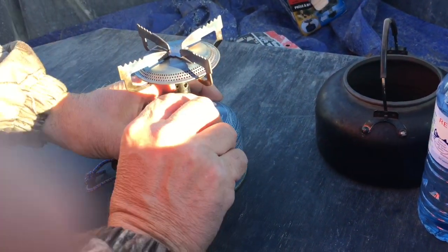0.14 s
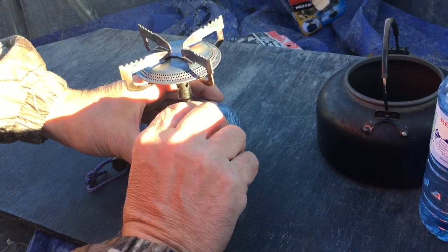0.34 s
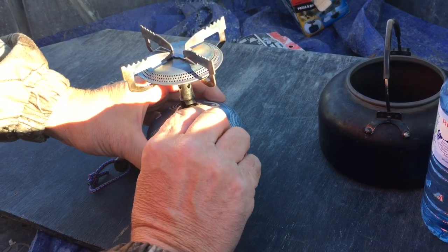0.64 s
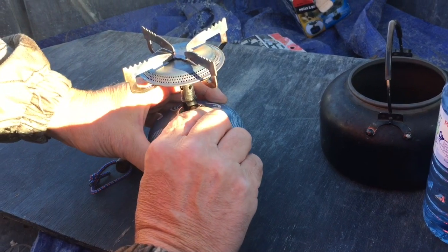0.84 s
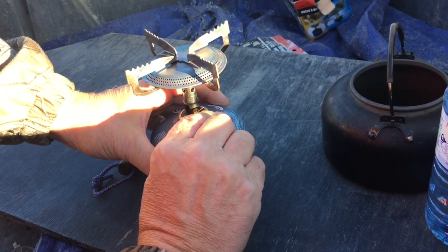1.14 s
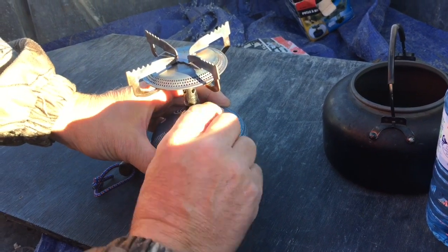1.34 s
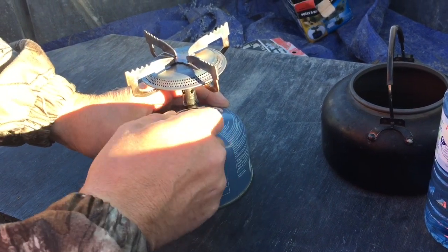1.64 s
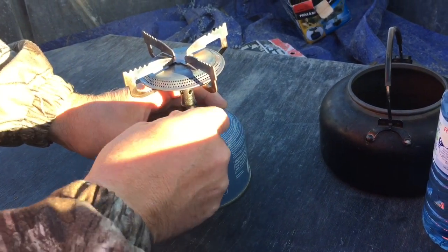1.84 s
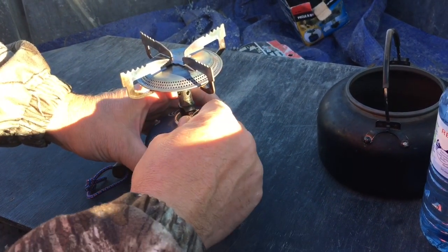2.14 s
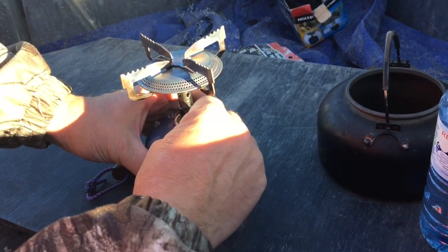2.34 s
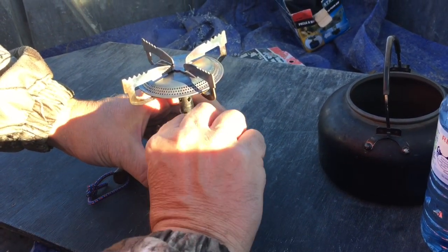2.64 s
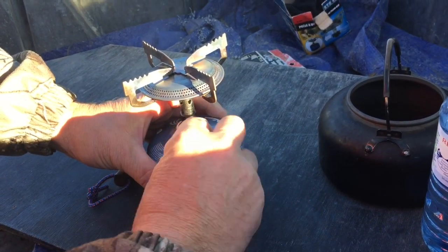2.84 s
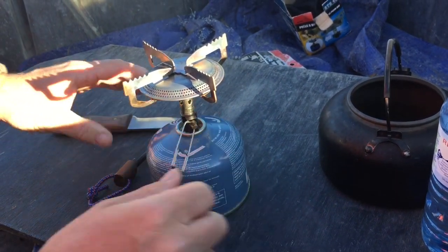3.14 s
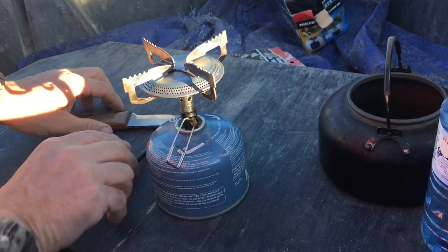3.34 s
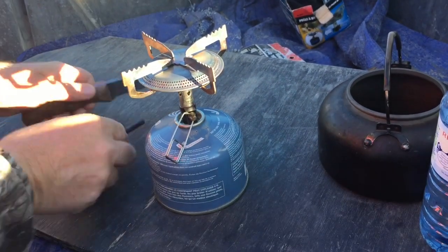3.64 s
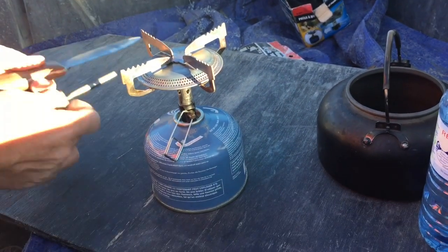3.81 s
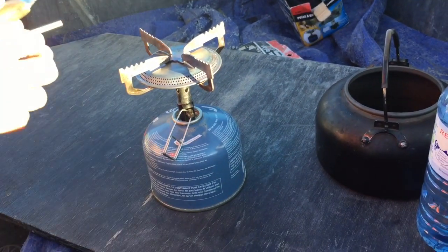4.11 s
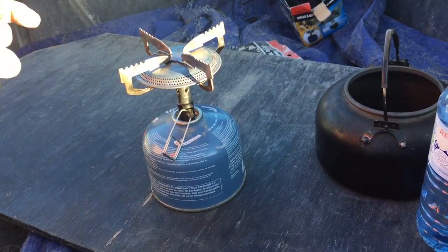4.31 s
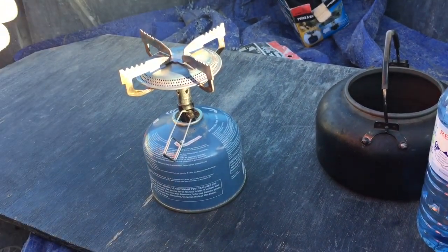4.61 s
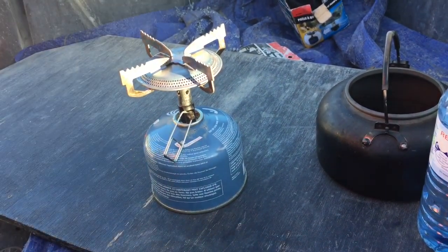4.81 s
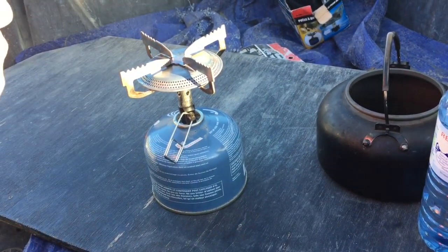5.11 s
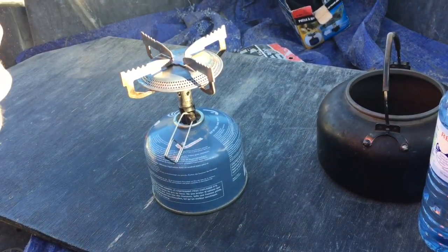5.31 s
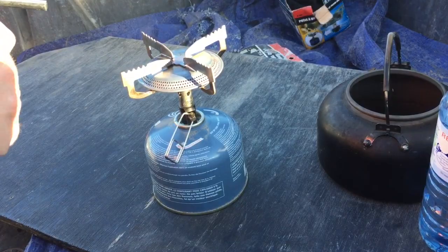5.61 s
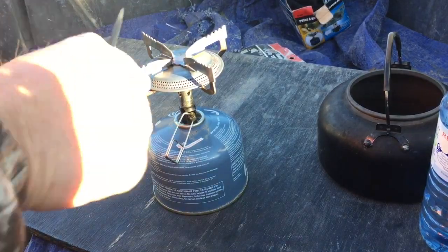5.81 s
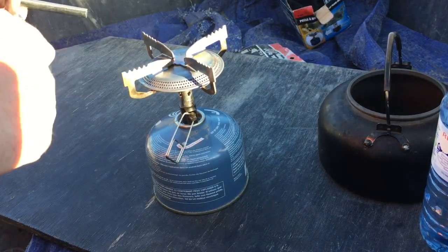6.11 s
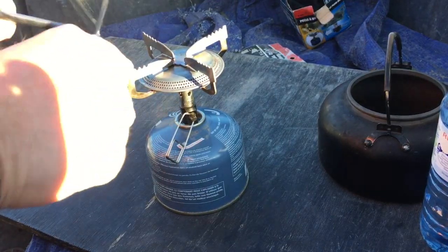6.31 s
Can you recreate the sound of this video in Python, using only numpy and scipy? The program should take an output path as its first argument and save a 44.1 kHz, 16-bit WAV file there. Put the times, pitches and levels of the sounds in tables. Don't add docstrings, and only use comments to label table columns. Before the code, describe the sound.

Dull handling knocks, bright metallic clinks, then a sharp unlit gas hiss that holds on over wooden scraping, steel taps and a faint far engine hum.

```python
import sys
import numpy as np
from scipy import signal
from scipy.fft import rfft, irfft, next_fast_len
from scipy.io import wavfile
from scipy.ndimage import uniform_filter1d

SR = 44100
rng = np.random.default_rng(int(sys.argv[2]) if len(sys.argv) > 2 else 0)


def decibels_to_gain(level_db):
    exponent = np.asarray(level_db, float) / 20
    return 10 ** exponent


def unload_audio(sound):
    columns = np.transpose(np.atleast_2d(sound))
    steps = np.round(np.clip(columns, -1, 1) * 32767)
    wavfile.write(sys.argv[1], SR, steps.astype(np.int16))


N = 284886

# frequency in Hz, density in dB per Hz.
JET_SPECTRUM = [(200, -8.5), (300, 0.5), (484, -10), (630, 1), (800, -9), (1470, -8.5), (2200, -6.5),
                (3390, -13.5), (4960, -1), (8070, -10.5), (10600, -18), (12500, -12), (15700, -5.5)]
# frequency in Hz, width in Hz, level in dB.
BURNER_RESONANCES = [(1000, 196, -11.5), (1848, 230, -4), (2475, 110, -2), (3770, 140, -16.5),
                     (4795, 210, -5), (5040, 120, 1), (5310, 73, -7), (5870, 49, -9), (6800, 150, -12),
                     (7250, 99, -8), (7590, 105, -9.5), (9040, 390, -15.5), (11430, 140, -11.5)]
# frequency in Hz, width in Hz, level in dB.
HEAD_WHISTLES = [(2755, 130, -11), (5060, 46, -1), (5370, 57, -8.5), (7310, 83, -9), (9930, 96, -14),
                 (11440, 120, -11)]
# frequency in Hz, level in dB, t60 in seconds.
ARM_MODES = [(711, -4, 0.032), (1170, -11, 0.044), (1640, -15, 0.1), (3247, -8, 0.07), (4000, -22, 0.15),
             (4443, -5, 0.07), (5180, -9.5, 0.076), (5765, -8, 0.06), (6160, -3.5, 0.047),
             (6770, -1.5, 0.043), (7200, -1.5, 0.011), (8730, -14, 0.043), (12440, -13, 0.035),
             (14300, -9, 0.022)]
# frequency in Hz, level in dB, t60 in seconds.
CANISTER_MODES = [(2540, -9, .5), (2630, 0, 0.44), (2720, -11, .25), (2757, -5, .36), (2860, -12, 0.56),
                  (3356, 3, .13), (3445, -6, .3), (3680, -8, .2), (3747, 0, 0.42), (3940, -2, .36),
                  (4160, -9, .23), (4800, -7, .16), (5701, -6, .18), (6500, -8, .19)]
# frequency in Hz, level in dB, t60 in seconds.
STEEL_MODES = [(1165, -11, .025), (1517, -1.5, 0.032), (1900, -24, 0.032), (2330, 0.5, 0.046),
               (2700, 12, 0.024), (3140, 1, 0.039), (4110, 1.5, 0.05), (4500, 2, 0.022), (6000, 2.5, 0.025),
               (7400, -7, 0.049), (9500, -32, 0.026), (10800, -32, .02), (11270, 2, 0.051)]
# start in seconds, peak in dB, strongest frequency in Hz,
# rattle length in seconds, crack share in dB.
CLINKS = [
    (.1694, -26.5, 3600, .012, 0),
    (1.461, -55, 4430, .036, -9),
    (1.8102, -22.5, 6940, 0.011, 2.5),
    (1.968, -36, 6000, 0.013, 0),
    (2.23, -36, 4350, 0.024, -15),
    (2.2753, -37, 1640, 0.01, -4),
    (2.3555, -27, 4550, 0.013, 3),
    (2.4153, -17.5, 2200, 0.011, 6),
]
# start in seconds, peak in dB, strongest frequency in Hz,
# rattle length in seconds, crack share in dB.
THREAD_SLIPS = [(1.49, -54, 6860, .039, -11), (1.52, -49, 1650, 0.036, -4), (1.585, -50, 5830, 0.031, -6),
                (1.806, -25, 711, 0.0053, -32), (1.78, -42, 5700, 0.02, -4), (1.795, -38, 5600, 0.009, -5),
                (1.862, -41, 5900, 0.013, 2), (1.93, -50, 7200, 0.033, -11), (2.05, -57, 6440, 0.092, -6.5),
                (2.24, -43, 4200, 0.016, 4), (2.36, -23.5, 7200, 0.01, -5),
                (2.372, -25.5, 4600, 0.0087, -2)]
# start in seconds, peak in dB, strongest frequency in Hz,
# rattle length in seconds, crack share in dB.
STEEL_TAPS = [
    (5.5132, -19, 4200, 0.015, 3.5),
    (5.8555, -27, 2920, 0.0065, 3),
    (5.888, -35, 2200, 0.0056, 3),
    (6.1676, -18, 2600, 0.007, 8),
    (6.2036, -26, 2400, 0.003, 2),
    (6.2294, -32, 1910, .0068, 2),
]
# start in seconds, peak in dB, strongest frequency in Hz,
# rattle length in seconds, crack share in dB.
STEEL_SCRAPES = [
    (5.518, -27, 7400, 0.0059, 4),
    (5.842, -26.5, 2670, 0.018, -3),
    (5.862, -30, 2500, 0.011, 0),
    (6.21, -33, 2570, .01, -1),
    (6.303, -30, 2630, 0.02, 4),
    (6.335, -30, 2690, 0.015, 0),
    (6.308, -27, 4000, 0.048, 6),
    (5.845, -31, 4300, 0.043, 9),
]
# start in seconds, peak in dB, strongest frequency in Hz,
# rattle length in seconds, crack share in dB.
BLADE_GRATES = [
    (3.475, -33.5, 2400, 0.015, 3),
    (3.549, -30, 2800, 0.023, 6),
    (3.562, -31, 3000, .017, 8),
    (3.6, -39, 1400, 0.044, 3),
    (3.236, -38, 2300, 0.0185, 3),
    (3.447, -33.5, 2000, .004, 8),
]
# start in seconds, peak in dB, length in seconds.
CANISTER_THUDS = [
    (1.46, -46.5, 0.034),
    (1.523, -48, 0.042),
    (1.809, -35, 0.013),
    (1.865, -41, 0.015),
    (2.242, -47, 0.02),
    (2.278, -40.5, 0.012),
    (2.419, -28, 0.015),
]
# start in seconds, level in dB.
CANISTER_BLOWS = [
    (1.812, -56),
    (2.357, -54),
    (2.417, -46),
]
# start in seconds, peak in dB, frequency
# in Hz, t60 in seconds.
LONE_RINGS = [(.172, -48.5, 1640, .3), (1.46, -62, 4430, .06), (1.521, -54, 1640, 0.24),
              (.171, -44, 14200, .05), (1.588, -62, 12600, 0.15), (1.59, -60, 9800, 0.091),
              (1.59, -57, 6000, .08), (1.784, -58, 1640, 0.24), (1.812, -41.5, 1638, 0.19),
              (1.812, -49, 3219, 0.081), (1.812, -54, 4440, .23), (1.813, -44, 5922, 0.13),
              (1.812, -50, 8000, .1), (1.812, -41, 12500, .065), (1.811, -41, 14300, .04),
              (1.866, -49.5, 4420, .12), (1.866, -52, 3120, 0.14), (1.97, -43, 4660, 0.056),
              (1.97, -44, 5674, 0.044), (1.972, -53, 4500, 0.2), (2.23, -41, 4430, .11),
              (.171, -49, 13000, .04), (2.05, -57, 6900, 0.18), (2.08, -57, 5900, .2),
              (2.21, -58, 1664, .2), (2.278, -50, 14400, .04), (2.278, -44, 7000, .04),
              (2.357, -45, 14400, .05), (2.374, -44, 14500, .05), (2.416, -36, 4480, .06),
              (2.416, -41, 14800, .04), (2.418, -58, 10300, 0.091), (3.226, -31, 2160, .03),
              (3.226, -30, 5100, .03), (2.357, -35, 4350, .05), (3.228, -43, 11500, .02),
              (3.245, -34, 2120, .05), (3.246, -39, 12700, .04), (3.247, -46, 14800, .03),
              (3.526, -34, 2270, 0.022), (3.89, -26, 2510, 0.028), (3.89, -26.5, 4950, 0.03),
              (5.514, -23, 4085, 0.045), (5.514, -32, 2120, .05),
              (1.812, -44, 15500, .04), (2.24, -53, 1650, .15), (2.278, -46, 1645, 0.11),
              (2.358, -44, 1650, 0.18), (2.416, -33, 1150, 0.058), (2.418, -34, 370, .22),
              (6.168, -30, 1490, .03), (6.168, -25, 2230, .03), (6.169, -21, 2710, 0.024),
              (6.169, -21, 3960, 0.028), (6.168, -32, 5930, .03)]
# time of the top in seconds, peak in dB, frequency in Hz, rise in seconds.
SQUEAKS = [(1.79, -45, 6850, .004), (1.801, -46, 3100, .003), (1.812, -36, 5300, .003),
           (1.812, -35, 5950, .003), (1.822, -44, 3150, .004), (1.872, -42, 6900, .004),
           (1.885, -52, 3150, .004), (2.605, -45, 420, .008), (2.605, -45, 660, .008),
           (2.603, -46, 1700, .007), (2.62, -42, 2600, .003), (5.852, -23, 2600, .003),
           (5.8565, -21, 2620, .003), (5.856, -23, 4400, .002), (5.866, -29, 2750, .004),
           (5.87, -25, 1150, .005), (5.871, -23, 1500, .003), (5.875, -22, 2720, .005),
           (5.879, -23, 1530, .004), (5.884, -26, 2700, .004), (6.321, -20, 2700, .004),
           (6.325, -22, 2750, .003), (6.33, -16.5, 2750, .003), (6.33, -31, 3900, .002),
           (6.339, -27, 2650, .004), (6.34, -33, 1550, .004), (6.345, -32, 1100, .004),
           (6.346, -24, 2650, .003), (6.353, -28, 2600, .003), (6.356, -31, 4100, .004),
           (1.87, -38, 5450, .004), (5.85, -29, 4300, .004), (5.891, -28, 2250, .003),
           (5.889, -31, 3700, .002)]
# time of the top in seconds, level in dB, then rise and
# fall in seconds for 20 dB.
DRAG_JERKS = [
    (3.45, -37, .004, .06),
    (3.487, -37.5, 0.027, 0.099),
    (3.525, -41, .04, .08),
    (3.578, -31.5, 0.043, .06),
    (3.605, -32, 0.021, 0.084),
    (3.645, -36, 0.046, .08),
    (3.69, -38.5, 0.063, 0.055),
    (3.72, -45, .03, 0.042),
]
# frequency in Hz, width in Hz, level in dB.
BOARD_RESONANCES = [(140, 70, -2), (255, 60, 0.5), (397, 120, -5), (590, 110, -1), (760, 140, -8.5),
                    (1000, 200, -10), (1270, 160, -12), (2600, 1800, -15)]
# time of the top in seconds, peak in dB,
# frequency in Hz, rise in seconds.
BOARD_JUDDERS = [(3.451, -28.5, 640, 0.0033), (3.457, -33, 380, 0.0072), (3.462, -32, 180, 0.0086),
                 (3.483, -33.5, 675, .01), (3.483, -39, 1310, 0.0094), (3.53, -36, 270, .015),
                 (3.535, -44, 650, .012), (3.57, -29.5, 255, 0.019), (3.568, -33, 1140, 0.0077),
                 (3.572, -37, 1310, .007), (3.578, -37, 780, 0.0062), (3.585, -27, 560, 0.01),
                 (3.598, -28, 610, 0.0088), (3.597, -24.5, 263, 0.0056), (3.598, -25, 135, .007),
                 (3.63, -32, 580, .012), (3.665, -30, 287, .01), (3.672, -35, 610, 0.0085),
                 (3.685, -33, 675, .006), (3.69, -30, 262, 0.017), (3.68, -37, 420, 0.013),
                 (3.7, -33, 645, .006), (3.698, -41, 1180, 0.0091), (3.725, -39, 600, 0.0065),
                 (3.73, -39, 270, .008)]
# time of the top in seconds, level in dB, relative level of the low part
# in dB, rise and fall alike in seconds for 20 dB.
RUBS = [
    (.25, -54, 5, 0.19),
    (.315, -54, -6, 0.054),
    (1.51, -62.5, 11, 0.14),
    (1.84, -58, 8.5, 0.17),
    (2.1, -62, 7, 0.22),
    (2.26, -65, 11, 0.2),
    (2.44, -59.5, 17.5, 0.14),
]
# frequency in Hz, density in dB per Hz.
RUB_SPECTRUM = [(760, -34), (1300, -22), (2040, -11), (2220, -28), (2340, -4), (3110, -1), (3960, -10),
                (5720, -4), (8000, -16), (12700, -10.5), (16000, -15)]
# time of the top in seconds, level in dB, then rise and fall in
# seconds for 20 dB.
GRIP_SHOVES = [
    (.01, -22.5, .015, 0.0626),
    (.062, -24, 0.046, 0.08),
    (.13, -27, 0.17, 0.02),
    (.34, -53, 0.093, 0.2),
]
# frequency in Hz, density in dB per Hz.
GRIP_SPECTRUM = [(59, -33), (100, -14), (178, 9.5), (245, -6), (364, -1.5), (511, -11), (702, -14),
                 (1500, -47), (1950, -66), (3300, -120)]
# time of the top in seconds, level in dB, then rise and fall in seconds for 20
# dB.
HAND_RUSTLES = [
    (0, -36, .01, 0.067),
    (.05, -43.5, 0.11, 0.037),
    (.18, -59, .05, 0.13),
    (.27, -53, 0.1, 0.092),
]
# time of the top in seconds, peak in dB, frequency in Hz,
# rise in seconds.
CASE_JOLTS = [(.012, -19, 260, 0.0058), (.029, -17, 170, 0.0033), (.028, -34, 1170, .006),
              (.045, -37, 1150, .006), (.055, -41, 1860, 0.0071), (.062, -15, 395, .003),
              (.061, -25, 690, .002), (.061, -30, 1100, 0.0022), (.065, -11, 230, .003),
              (.083, -20, 150, .005), (.092, -18, 400, 0.0033), (.112, -37, 880, 0.0024),
              (.115, -16, 290, 0.0027), (.128, -13.5, 227, 0.0044), (.142, -19, 280, .003),
              (.16, -25.5, 330, 0.0036), (.2, -22.5, 210, 0.0043), (0.033, -46, 2340, .02),
              (.035, -31, 450, 0.0036), (0.016, -29, 595, 0.0034), (.125, -33, 630, 0.0037),
              (.098, -30, 670, 0.0033)]
# frequency in Hz, level in dB, t60 in seconds.
CASE_MODES = [(134, 0, 0.11), (215, 1, 0.023), (280, 2, 0.046), (392, -5.5, 0.052), (590, -8, 0.059),
              (955, -28, 0.031)]
# start in seconds, peak in dB, strongest frequency in Hz,
# rattle length in seconds.
CASE_KNOCKS = [
    (0.058, -16.5, 213, 0.0037),
    (.11, -22, 187, 0.006),
    (2.414, -23, 380, 0.0056),
]
# time of the top in seconds, rumble in dB, buffet in dB, rise in
# seconds for 20 dB.
GUSTS = [(.01, -31, -27, 0), (.07, -29, -22, 0.28), (.33, -38, -57, 0.28), (1.169, -32.5, -40, 0.12),
         (2.28, -43.5, -66, 0.3), (2.425, -54, -40, 0.3), (2.719, -31, -55, 0.09), (2.94, -33, -41, 0.05),
         (3.029, -44, -53, -0.44), (3.201, -32.5, -33, .07), (3.47, -44, -38, 0.02), (3.6, -59, -41, 0.23),
         (5.2, -31, -37, 0.1), (5.471, -30, -41.5, 0.07), (5.89, -35, -53, 0.08), (6.04, -43, -72, 0.24)]
# time in seconds, level in dB.
ENGINE_LEVEL = [(.3, -38.5), (1.04, -39.5), (1.18, -36.5), (1.3, -38.5), (1.84, -35.5), (2.2, -42.5),
                (2.45, -40), (2.68, -40.5), (2.78, -50), (3.2, -45.5), (3.35, -46), (3.6, -39.5),
                (4.17, -45), (4.5, -47.5), (5.2, -46.5), (5.6, -48.5), (6.03, -56), (6.46, -49)]
# frequency in Hz, density in dB per Hz.
FLOOR_SPECTRUM = [(200, 3.5), (223, -11), (294, -9.5), (440, -18.5), (950, -21), (1130, -11), (1350, -20.5),
                  (2420, -21), (3430, -25), (9580, -34.5), (16000, -38)]
# time in seconds, level in dB.
FLOOR_LEVEL = [(0, -71), (.45, -62), (1.2, -66.5), (2.5, -65.5), (6.46, -66)]


def gas():
    valve_s, crack_s, turn_s = 2.576, 0.03, 0.13
    full_db, ajar_db, sag_db, sag_s = -39.5, -10, -4, 1.95
    shade_s, shade_length_s, shade_db = 5.2, 0.2, -0.1
    since = np.arange(N) / SR - valve_s
    ajar = 1 - np.clip(since / turn_s, 0, 1)
    pressure_db = full_db + ajar_db * ajar + sag_db * (1 - np.exp(-np.maximum(since - turn_s, 0) / sag_s))
    shade = np.exp(-((since + valve_s - shade_s) / shade_length_s) ** 2)
    dark_db = 3 * ajar + shade_db * shade
    late = np.clip((since - 0.017) / 0.006, 0, 1)

    def colour(hz):
        return shape(JET_SPECTRUM, hz) * decibels_to_gain(-9.0) + humps(hz, BURNER_RESONANCES) * 0.9

    high = noise(lambda hz: colour(hz) * band(hz, 2700, 27000, order=4), 2.25, 0.63)
    low = noise(lambda hz: colour(hz) * band(hz, 220, 4070, order=4), 1.8, 0.91)
    whistle_db = -10.5 + 3.5 * np.exp(-abs(since) / 0.7)
    whistles = noise(lambda hz: humps(hz, HEAD_WHISTLES) ** 1.38, 4.1, 1.5) * decibels_to_gain(whistle_db)
    opening = np.clip(since / crack_s, 0, 1) ** 2
    return opening * decibels_to_gain(pressure_db) * (high + late * decibels_to_gain(dark_db - 2.0) * low + whistles)


def metal():
    stove = strikes(CLINKS, ARM_MODES, 0.012, 7.9, 8.0, 0.24, 0.8, 5600)
    stove = stove + strikes(THREAD_SLIPS, ARM_MODES, 0.46, 0., 16.0, 0.13, 0.82, 2800)
    steel = strikes(STEEL_TAPS, STEEL_MODES, 0.011, 6.4, 11.0, 0.24, 0.69, 2250)
    steel = steel + strikes(STEEL_SCRAPES, STEEL_MODES, 0.43, 0., 26.0, 0.13, 0.77, 4900)
    steel = steel + strikes(BLADE_GRATES, STEEL_MODES, 0.48, 0., 12., 0.27, 0.55, 1400)
    return nearby(stove + thuds()) + rings() + steel


def strikes(rows, modes, rise, tick, focus_db, octaves, below, above_hz):
    t, mix, size = np.arange(SR // 7) / SR, np.zeros(N), 4096
    f, db, t60 = np.transpose(modes)[:, :, None]
    chance = rng.standard_normal((len(rows), size))
    for (s, peak_db, hz, length, crack_db), z in zip(rows, chance):
        u = t[:size] / max(length, .0005)
        rattle = z * decibels_to_gain(-20 * u ** 0.98) * np.minimum(u / max(rise, .001), 1) ** 2
        rattle[3] += tick
        drive = abs(rfft(rattle)[(f * size / SR).astype(int)]) + 0.18 * np.linalg.norm(rattle)
        near_db = focus_db * np.exp(-(np.log2(f / hz) / octaves) ** 2)
        spot_db = 2.5 * z[-2 * len(f):-len(f), None]
        twin = 1 + .5 * np.cos(2 * np.pi * f * 0.0087 * z[-len(f):, None] * t)
        decay = decibels_to_gain(db + near_db + spot_db - 60 * t / t60)
        ring = (decay / drive * twin * np.sin(2 * np.pi * f * t)).sum(0)
        body = passed(signal.oaconvolve(ring, rattle), 0.93 * f.min(), 0.98 * f.max(), order=3)
        body[:size] += decibels_to_gain(crack_db) * passed(rattle, below * hz, hz + above_hz)
        add(mix, s, decibels_to_gain(peak_db) * body)
    return mix


def thuds():
    mix, t = np.zeros(N), np.arange(4096) / SR
    chance = rng.standard_normal((len(CANISTER_THUDS), len(t)))
    for (s, peak_db, length), z in zip(CANISTER_THUDS, chance):
        u = t / length
        burst = z * decibels_to_gain(-20 * u ** 0.97) * np.minimum(u / 0.099, 1)
        add(mix, s, decibels_to_gain(peak_db) * passed(burst, 260, 654))
    return mix


def nearby(x, tail_db=-7.5, t60=0.11):
    t = np.arange(6000) / SR
    tail = rng.standard_normal(len(t)) * decibels_to_gain(-60 * t / t60) * (t > .0015)
    return x + decibels_to_gain(tail_db) * signal.oaconvolve(x, tail / np.linalg.norm(tail))[:N]


def rings():
    rise_s = 0.0016
    lone = [(s, db, hz, rise_s, abs(t60)) for s, db, hz, t60 in LONE_RINGS]
    wall = [(s, db + mode_db, hz, rise_s, t60) for s, db in CANISTER_BLOWS for hz, mode_db, t60 in CANISTER_MODES]
    return tones(lone) + tones(wall, fuzzy_hz=10800)


def squeaks():
    first_click = decibels_to_gain(-23) * np.exp(-np.arange(N) / SR / .0012)
    return first_click + jerks(SQUEAKS, 4.5)


def drag():
    return swells(*np.transpose(DRAG_JERKS)) * noise(lambda hz: humps(hz, BOARD_RESONANCES) ** 1.25, 1.3, 3.0)


def judders():
    return jerks(BOARD_JUDDERS + CASE_JOLTS, 6.8)


def rubs():
    body = [(f, 10. / t60 + 60, db) for f, db, t60 in ARM_MODES]
    high = noise(lambda hz: shape(RUB_SPECTRUM, hz) * (.6 + humps(hz, body)) * band(hz, 1200, 17000), 2., 2.)
    low = noise(lambda hz: band(hz, 270, 750, order=2), 2.5, 2.)
    s, db, low_db, spread = np.transpose(RUBS)
    return swells(s, db, spread, spread) * high + swells(s, db + low_db - 11.5, spread, spread) * low


def grip():
    rumble = noise(lambda hz: shape(GRIP_SPECTRUM, hz) * band(hz, 130, 1500), 0., 3.)
    case = [(1150, 250, 10.0), (2350, 60, 5), (5950, 40, -18)]

    def rustle_colour(hz):
        return (humps(hz, case) + decibels_to_gain(-6) * band(hz, 800, 3500, order=2)) * band(hz, 300, 6500)

    rustle = noise(rustle_colour, 1.5, 1.5)
    return swells(*np.transpose(GRIP_SHOVES)) * rumble + swells(*np.transpose(HAND_RUSTLES)) * rustle


def knocks():
    rows = [(*row, -24) for row in CASE_KNOCKS]
    return strikes(rows, CASE_MODES, 0.37, 0., 17.0, 0.85, 1.0, 590)


def gusts():
    s, rumble_db, buffet_db, rise = np.transpose(GUSTS)
    fall_share, buffet_share = 0.81, 0.66
    calming_db = -1.14 * np.arange(N) / SR
    rumble = swells(s, rumble_db, rise, fall_share * rise) + decibels_to_gain(-49.5 + calming_db)
    buffet_rise = buffet_share * rise
    buffet = swells(s, buffet_db, buffet_rise, fall_share * buffet_rise) + decibels_to_gain(-68 + calming_db)
    rumble = rumble * noise(lambda hz: band(hz, 60.5, 58.6, order=3))
    return rumble + buffet * noise(lambda hz: band(hz, 82, 166, order=4), 0., 1.4)


def engine():
    t = np.arange(N) / SR
    phase = 2 * np.pi * np.cumsum(98.8 - .8 * t) / SR
    waver = evened(sum(np.sin(2 * np.pi * (f * t + rng.random())) for f in np.geomspace(2, 14, 12)))
    level = decibels_to_gain(columns(ENGINE_LEVEL) + 2.5 * waver) * (t > .22)
    tone = np.sin(phase) + decibels_to_gain(-30.5) * np.sin(2 * phase)
    return np.sqrt(2) * uniform_filter1d(level, size=2000) * tone


def far_wash():
    return decibels_to_gain(columns(FLOOR_LEVEL)) * noise(lambda hz: shape(FLOOR_SPECTRUM, hz) * band(hz, 253, 20000), 1.)


def jerks(rows, ring_share):
    return tones([(s, db, hz, abs(rise), ring_share * abs(rise)) for s, db, hz, rise in rows])


def tones(rows, fuzzy_hz=9000):
    mix = np.zeros(N)
    for (s, peak_db, hz, rise, t60), z in zip(rows, rng.standard_normal((len(rows), SR // 2))):
        t = np.arange(-2 * rise, min(t60, .4), 1 / SR)[:len(z)]
        level = np.where(t < 0, np.exp(-2 * (t / rise) ** 2), decibels_to_gain(-60 * t / t60))
        fuzz, size = min(hz / fuzzy_hz, 1) ** 2, int(1 / (.05 * hz / SR)) + 1
        flutter = evened(uniform_filter1d(uniform_filter1d(z[:len(t)], size), size))
        level = level * (1 - fuzz + fuzz * flutter)
        wobble = 0.43 * np.sin(2 * np.pi * (hz * 0.022 * z[1] * t + z[2]))
        phase = 2 * np.pi * (hz * t + z[0]) + wobble
        add(mix, max(s - 2 * rise, 0), decibels_to_gain(peak_db) * level * np.sin(phase))
    return mix


def swells(s, db, rise, fall):
    t = np.arange(0, N + 64, 64)[:, None] / SR
    away = np.maximum((s - t) / abs(rise), (t - s) / abs(fall))
    gain = np.sqrt((decibels_to_gain(db - 20 * away) ** 2).sum(1))
    return np.interp(np.arange(N) / SR, t[:, 0], gain)


def noise(colour, patchy_db=0., grain_db=0.):
    a, b = rng.standard_normal((N // 128 + 8, 257, 2), dtype=np.float32).T
    patches = rng.standard_normal((N // 512 + 4, 257)).T.repeat(4, axis=1)[:, :a.shape[1]]
    patches = evened(uniform_filter1d(uniform_filter1d(patches, size=4, axis=0), size=24, axis=1))
    spectrum = (a + 1j * b) * decibels_to_gain(patchy_db * patches).astype(np.float32)
    x = signal.istft(spectrum, nperseg=512, noverlap=384)[1][:N]
    x = x * decibels_to_gain(grain_db * evened(uniform_filter1d(rng.standard_normal(N), size=90)))
    size = next_fast_len(N)
    return evened(irfft(rfft(x, size) * colour(np.fft.rfftfreq(size, 1 / SR)), size)[:N])


def humps(hz, peaks):
    return np.sqrt(sum(decibels_to_gain(db) ** 2 / (1 + (2 * (hz - f) / w) ** 2) for f, w, db in peaks))


def shape(points, hz):
    f, db = np.transpose(points)
    return decibels_to_gain(np.interp(np.log(hz + 1), np.log(f + 1), db))


def band(hz, lo_hz, hi_hz, order=3):
    return 1 / np.sqrt((1 + (lo_hz / (hz + 1)) ** (2 * order)) * (1 + (hz / hi_hz) ** (2 * order)))


def passed(x, lo_hz, hi_hz, order=2):
    edges = np.clip([lo_hz, hi_hz], 30, 17000)
    y = signal.sosfilt(signal.butter(order, edges, "bandpass", fs=SR, output="sos"), x)
    return y / abs(y).max()


def evened(x):
    return x / np.sqrt(np.mean(x ** 2) + 1e-20)


def columns(rows):
    return np.interp(np.arange(N) / SR, *np.transpose(rows))


def add(mix, s, sound):
    part = mix[round(s * SR):][:len(sound)]
    part += sound[:len(part)]


def scene():
    stove = gas() + metal() + squeaks() + rubs()
    board = drag() + judders()
    camera = grip() + knocks()
    background = gusts() + engine() + far_wash()
    return (stove + board + camera + background)[None]


def top_cut(x):
    return signal.sosfilt(signal.butter(12, 16350, fs=SR, output="sos"), x)


def record(dry):
    thin = signal.sosfilt(signal.butter(2, 50, "highpass", fs=SR, output="sos"), dry)
    treble_edge = signal.firwin(1023, 15860, window=("kaiser", 10), fs=SR)
    mix = signal.oaconvolve(thin, treble_edge[None], "same")
    return top_cut(mix)


dry = scene()
out = record(dry)
unload_audio(out)
```